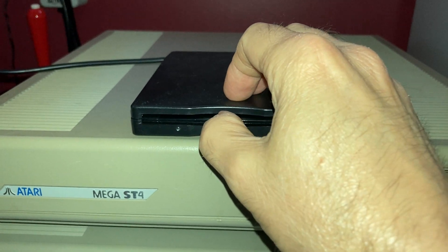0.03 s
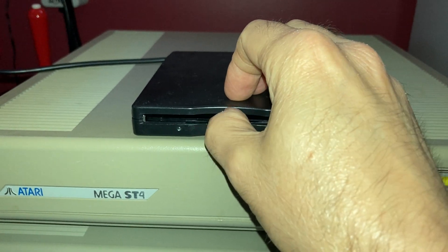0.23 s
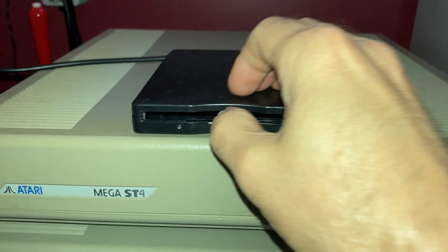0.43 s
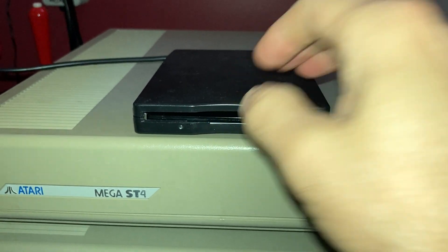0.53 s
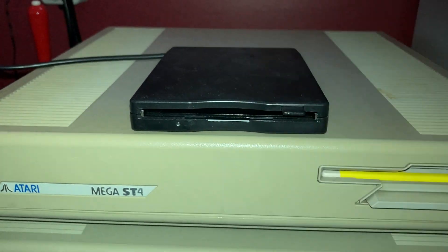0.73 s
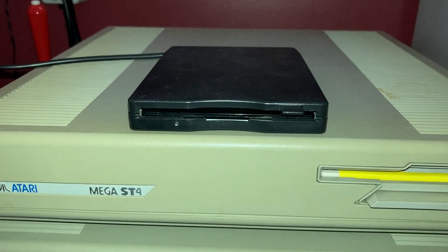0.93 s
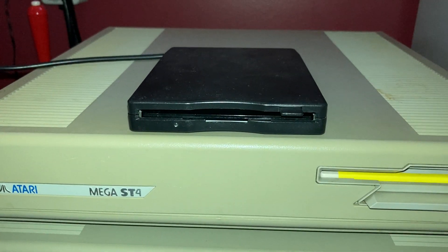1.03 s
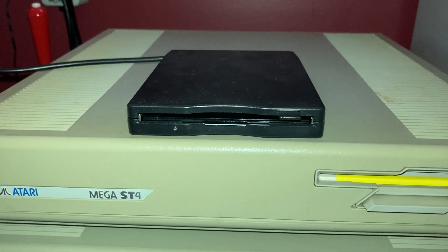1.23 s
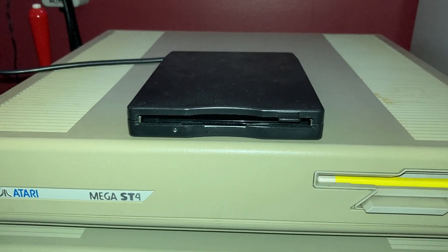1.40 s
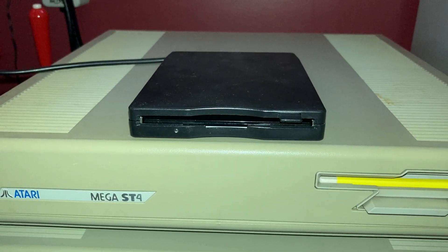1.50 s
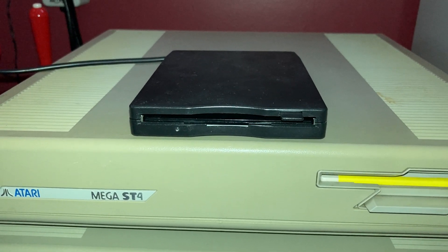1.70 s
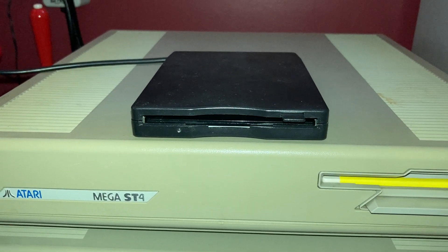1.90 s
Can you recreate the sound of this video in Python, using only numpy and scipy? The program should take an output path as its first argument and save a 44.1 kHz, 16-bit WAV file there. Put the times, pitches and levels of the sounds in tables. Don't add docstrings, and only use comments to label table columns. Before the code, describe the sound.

Sharp plastic-and-metal clack of a disk seating in a drive, with constant computer fan noise behind.

```python
import sys
import numpy as np
from scipy import signal
from scipy.fft import rfft, irfft
from scipy.io import wavfile
from scipy.ndimage import uniform_filter1d

SR = 44100
rng = np.random.default_rng(int(sys.argv[2]) if len(sys.argv) > 2 else 0)


def convert_level_to_amplitude(level_db):
    exponent = np.asarray(level_db, float) / 20
    return 10 ** exponent


def file_out(sig):
    cols = np.atleast_2d(sig).T
    lim = np.clip(cols, -1, 1)
    pcm = np.round(lim * 32767).astype(np.int16)
    wavfile.write(sys.argv[1], SR, pcm)


N = 85995
T = np.arange(N) / SR
BLADE_HZ, MOTOR_HZ, SHAFT_HZ = 381.6, 212.55, 22.3


def evened(x):
    return x / np.sqrt(np.mean(x ** 2) + 1e-20)


def read(points, hz):
    f, value = np.transpose(points)
    return np.interp(np.log(hz + 1), np.log(f + 1), value)


def slow(rate_hz, t, low_hz=0.47):
    f = np.geomspace(low_hz, rate_hz, num=20)[:, None]
    coarse = np.linspace(0, t[-1], num=600)
    waves = np.sin(2 * np.pi * (f * coarse + rng.random((20, 1)))) / f ** 0.44
    return np.interp(t, coarse, evened(waves.sum(0)))


def whine():
    tone_hz = [60, 667, 1567, 3300, 3434] + [BLADE_HZ * k for k in (1, 2, 3)] + [MOTOR_HZ * k for k in (7, 8, 9, 10, 12)] + [2998]
    # (level [dB rms], right lead [rad], right gain [dB])
    tone_levels = [(-66, 1, -4.5), (-71, 1, 1.5), (-83.5, 4.5, -2.5), (-74, 2.5, 1), (-79, 4.5, 4),
                   (-68, 1.2, 0.5), (-55.5, 0.48, 0.87), (-69, 1.1, 6), (-76, 1, 4), (-60.5, 0.7, 0.3),
                   (-61.5, -0.4, -1.3), (-71.5, 1.3, 6), (-79.5, -0.1, -0.5), (-78.5, -1, 2)]
    # (time [s], level [dB])
    hand_shade = [
        (0, -7),
        (.35, -6),
        (.62, -12.5),
        (1.1, 0),
        (1.95, -1.5),
    ]
    order_swell = {10: 5., 9: .4}
    throb_hz, throb_depth, throb_peak_s, waver_per_db = 1700, .6, 1.522, .2
    shade_end_s, shade_db, shade_hz = 0.55, -1.5, 1000

    out = np.zeros((2, N))
    clear = np.interp(T, *np.transpose(hand_shade))
    shaded = np.clip((shade_end_s - T) / 0.025, 0, 1)
    for hz, (db, lead, right_db) in zip(tone_hz, tone_levels):
        throbs = abs(hz - throb_hz) < 20
        waver_db = min(waver_per_db * (-48.0 - db), 3.)
        swell = order_swell.get(round(hz / MOTOR_HZ), 0) * (T - T[-1] / 2)
        drift = shade_db * (hz > shade_hz) * shaded + swell
        throb = 1 + throb_depth * throbs * np.cos(2 * np.pi * SHAFT_HZ * (T - throb_peak_s))
        waver = waver_db * (1 - .5 * throbs) * slow(39.96, T, low_hz=4.5)
        level = convert_level_to_amplitude(db + waver + clear * throbs + drift) * throb * np.sqrt(2)
        turn = 2 * np.pi * (hz * T + rng.random() + 0.014 * waver_db * slow(5.43, T))
        out += level * np.array([np.sin(turn), convert_level_to_amplitude(right_db) * np.sin(turn + lead)])
    return out


def cogging():
    base_db, db_per_oct = -77, -11
    out = np.zeros((2, N))
    for k in range(11, 42):
        side, weaker, phase, lead = rng.random(4)
        hz = MOTOR_HZ * k + SHAFT_HZ * np.round(4 * side - 2)
        level = convert_level_to_amplitude(base_db - 5.7 * weaker + db_per_oct * np.log2(hz / 2500) + 5.3 * slow(17, T))
        out += level * np.sin(2 * np.pi * (hz * T + phase + np.array([[0], [.5 * lead]])))
    return out


def air(spectrum, patchy_db, comb_db=0):
    frames, hz = N // 256 + 5, np.fft.rfftfreq(1024, 1 / SR)
    a, b, c, d, p = rng.standard_normal((frames, 513, 5)).T
    patches = evened(uniform_filter1d(uniform_filter1d(p, size=10, axis=0), size=12, axis=1))
    comb = comb_db * (hz > 4.5 * MOTOR_HZ) * np.cos(2 * np.pi * hz / MOTOR_HZ)
    colour = read(spectrum, hz) + comb
    z = np.array([a + 1j * b, c + 1j * d]) * convert_level_to_amplitude(colour[:, None] + patchy_db * patches)
    return evened(signal.istft(z, nperseg=1024, noverlap=768)[1][:, :N])


def ports(x, same, lead):
    split_hz, in_step_hz, lag_s = 5200, 8120, .0003005
    a, b = rfft(x, 2 * N)
    hz = np.fft.rfftfreq(2 * N, 1 / SR)
    late = -2 * np.pi * (hz - in_step_hz) * lag_s
    f, rad = np.transpose(lead + [(split_hz, -2 * np.pi * (split_hz - in_step_hz) * lag_s)])
    phase = np.where(hz > split_hz, late, np.interp(hz, f, rad))
    c = np.clip(read(same, hz), 0, 1)
    right = (c * a + np.sqrt(1 - c ** 2) * b) * np.exp(1j * phase)
    return irfft(np.array([a, right]), 2 * N)[:, :N]


def fan_air():
    # (frequency [Hz], level [dB])
    rush_low = [(30, -38), (55, -1.5), (300, -14), (750, -1.5), (950, -10), (1500, -5), (2100, -7),
                (2500, -12)]
    rush_high = [(2500, -14.5), (2750, -8.5), (3600, -22), (4200, -14), (5000, -21.5), (6200, -25),
                 (7000, -18), (9000, -57)]
    # (frequency [Hz], level [dB])
    hiss_colour = [(6000, -54), (8000, -5.5), (9500, -9), (11300, -6.5), (12200, -19), (13500, -15.5),
                   (15100, 1.5), (15900, -18)]
    # (frequency [Hz], level [dB])
    rumble_colour = [(35, -34), (60, -15), (150, 3.5), (240, 3.5), (400, -6.5), (700, -3.5), (1100, -35)]
    # (time [s], level [dB])
    handling = [
        (0, -61),
        (.2, -51.5),
        (.45, -52),
        (.7, -61.5),
        (1.14, -62),
        (1.22, -68),
        (1.95, -63.5),
    ]
    # (frequency [Hz], likeness [0-1])
    far_same = [(60, 1), (500, 0.78), (1500, 0.31), (4000, 0.13), (6000, 0.25), (7500, 0.97), (16000, 0.86)]
    # (frequency [Hz], phase [rad])
    far_lead = [(0, 0), (1400, 1.9), (1800, 1.33), (2700, -12), (3500, 5), (4600, 30.5)]

    rush = convert_level_to_amplitude(-56) * air(rush_low[:-1] + rush_high, patchy_db=1.0, comb_db=3)
    hiss = convert_level_to_amplitude(-70) * air(hiss_colour, patchy_db=1.2)
    rumble = convert_level_to_amplitude(np.interp(T, *np.transpose(handling))) * air(rumble_colour, patchy_db=2.0)
    return ports(rush + hiss + rumble, far_same, far_lead)


def latch():
    # (time [s], strength [dB], dullness [0-1])
    snaps = [(0.195, -22.5, 0.68), (0.1981, -26, 0.33), (0.2, -15.5, 0.17), (0.201, -21.5, 0),
             (0.2029, -13.5, 0.02), (0.2057, -12, 0.36), (0.2067, -11.5, 0.1), (0.2088, -16, 0.19),
             (.2112, -22.5, 0), (0.2131, -15, 0.51), (0.2185, -19.5, 0.5), (0.224, -42, 0.3),
             (.2275, -31, 0.8), (0.239, -40, .8), (0.262, -39.5, 0.7)]
    # (time [s], strength [dB], dullness [0-1])
    light_taps = [
        (0.0901, -33, 0.94),
        (.0925, -30, 0.93),
        (.0965, -36, 1),
        (.1, -33, 1),
        (0.147, -44, 0.97),
        (0.16, -51, 1),
        (0.3141, -36.5, 0.1),
        (.3163, -34, 0.01),
        (.581, -53, 0.44),
    ]
    # (frequency [Hz]), (level [dB]), (t60 [s])
    shell_hz = [670, 860, 955, 1200, 1405, 1625, 1778, 1958, 2372, 3125, 3742, 4180, 4820, 5175, 5365, 7800,
                8280, 11200, 12000, 14400]
    shell_db = [0.5, 2, 0, -4, -5.5, -1.5, -6.5, 2, -6.5, -7.5, -1, -0.5, -10, 0.5, -2.5, -4, -4.5, -12,
                -14.5, 4]
    shell_t60 = [.04, .035, .035, .035, .03, .04, .035, .035, .04, .025, .035, .025, .025, .025, .018, .012,
                 .02, .01, .01, .01]
    burst_s, dull_db_per_oct, tick_db = 0.00073, -4, 7
    firm = .6

    out, t = np.zeros((2, N)), np.arange(3000) / SR
    burst_t = t[:400] / burst_s
    tick_low_cut = signal.butter(2, 526, "high", fs=SR)
    for s, db, dull in snaps + light_taps:
        burst = rng.standard_normal((2, 400)) * burst_t ** .5 * np.exp(-burst_t)
        burst /= np.linalg.norm(burst, axis=1, keepdims=True)
        burst[:, 20] += firm
        body = np.zeros(len(t))
        for hz, d, t60 in zip(shell_hz, shell_db, shell_t60):
            level = convert_level_to_amplitude(d + dull * dull_db_per_oct * np.log2(hz / 700) - 60 * t / t60)
            body += level * np.sin(2 * np.pi * (hz * t + rng.random()))
        tick_hz = 13300 * convert_level_to_amplitude(-22 * dull)
        tick = 2 * np.pi * tick_hz / SR * np.exp(-2 * np.pi * tick_hz * t)
        body += 10 * convert_level_to_amplitude(tick_db) * signal.lfilter(*tick_low_cut, tick)
        at = round(s * SR)
        out[:, at:at + 3399] += convert_level_to_amplitude(db - 13.0) * signal.fftconvolve(burst, body[None], axes=1)
    return out


def case():
    # (frequency [Hz], level [dB], t60 [s], rise [s])
    case_modes = [(55.8, -35, 0.68, 0.016), (116.8, -36.5, 0.46, 0.01208), (140.4, -28, 0.24, 0.0083),
                  (186.5, -25, 0.0702, 0.0024), (214.3, -31.5, 0.33, .004), (307, -35, 0.25, 0.0076),
                  (352.7, -36.5, 0.21, 0.0044), (399, -24, 0.08, 0.0013), (432.6, -29, 0.14, 0.00201)]
    # (time [s], level [dB], held until damped [s], softness: loss away from 200 Hz [dB/octave])
    thumps = [
        (.199, 0, 0.12, 0.5),
        (0.091, -14, 0.012, 10),
        (.150, -22.5, 0.012, 11),
        (.41, -21.5, 0.037, 13),
        (1, -34, 0.021, -2),
    ]
    left_db = 3

    out = np.zeros(N)
    for s, db, held, soft_db in thumps:
        t = np.maximum(T - s, 0)
        damp = db - 1200 * np.maximum(t - held, 0)
        for hz, d, t60, rise in case_modes:
            level = convert_level_to_amplitude(d + damp - soft_db * abs(np.log2(hz / 200)) - 60 * t / t60)
            out += (1 - np.exp(-(t / rise) ** 2)) * level * np.sin(2 * np.pi * (hz * t + rng.random()))
    return np.array([convert_level_to_amplitude(left_db) * out, out])


def spread(x):
    cycles, corner_hz = 3.6, 70
    hz = np.fft.rfftfreq(2 * N, 1 / SR)
    turn = np.exp(-2j * np.pi * cycles * np.log(1 + hz / corner_hz))
    return irfft(rfft(x, 2 * N) * turn, 2 * N)[:, :N]


def room(x):
    # (frequency [Hz], t60 [s])
    room_t60 = [(100, 0.15), (260, 0.24), (700, 0.1), (1840, 0.19), (3700, 0.25), (5600, 0.17),
                (12800, 0.13)]
    room_db = -8

    taps = np.zeros((2, SR // 2))
    at = np.arange(160, SR // 2 - 20, 20)
    at = at + rng.integers(0, 20, (2, len(at)))
    np.put_along_axis(taps, at, rng.choice([-1., 1.], at.shape), 1)
    hz, t, z = signal.stft(taps, SR, nperseg=256)
    decay = convert_level_to_amplitude(-60 * t / read(room_t60, hz)[:, None])
    tail = signal.istft(z * decay, SR, nperseg=256)[1]
    return convert_level_to_amplitude(room_db) * signal.fftconvolve(x, tail / np.linalg.norm(tail[0]), axes=1)[:, :N]


def ring(x, hz, width_hz):
    r = np.exp(-np.pi * width_hz / SR)
    pole = r * np.exp(2j * np.pi * hz / SR)
    return 2 * signal.lfilter([1 - r], [1, -pole], x + 1e-18).real


def shutter():
    # (time [s], level [dB])
    slip_steps = [
        (0.3138, 1),
        (.3162, -3),
        (0.3216, -5),
        (0.3289, 0),
        (0.3335, -1),
        (0.3404, -2.5),
        (0.3462, -4),
        (0.3504, -4.5),
        (.356, -12),
    ]
    # (frequency [Hz], level [dB], width [Hz])
    buzz_notes = [(966, -4, 52), (1980, -5.5, 98), (2192, -1, 88), (2630, -5, 150), (1580, -12, 85),
                  (395, -11.5, 56)]
    buzz_db, linger_from_s, linger_rise_s, linger_db, linger_t60 = -38.5, 0.33, .01, -56, 1.3

    slips, t = np.zeros((2, N)), np.arange(100) / SR
    for s, db in slip_steps:
        scratch = 0.12 * rng.standard_normal((2, 100)) * np.exp(-t / .0008)
        scratch[:, 0] += 1
        slips[:, round(s * SR):][:, :100] += convert_level_to_amplitude(db) * scratch
    notes = sum(convert_level_to_amplitude(db) * ring(slips, hz, w) * SR / (2 * np.pi * w) for hz, db, w in buzz_notes)
    hum_hz = buzz_notes[0][0]
    hum = evened(ring(ring(rng.standard_normal((2, N)), hum_hz, 30.0), hum_hz, 230.0))
    since = np.maximum(T - linger_from_s, 0)
    linger = np.minimum(since / linger_rise_s, 1) * convert_level_to_amplitude(linger_db - 60 * since / linger_t60)
    return convert_level_to_amplitude(buzz_db) * notes + linger * hum


def spindle():
    # (frequency [Hz], level [dB rms])
    motor_tones = [(104.4, -66), (156.4, -61)]
    # (start [s], stop [s])
    start_s, stop_s = (.42, 1.17)
    db_per_s = -7.5

    on = np.clip(np.minimum(T - start_s, stop_s - T) / 0.015, 0, 1)
    hum = np.zeros(N)
    for hz, db in motor_tones:
        level = convert_level_to_amplitude(db + db_per_s * (T - start_s) + 3.7 * slow(15.6, T))
        hum += level * np.sqrt(2) * np.sin(2 * np.pi * hz * T)
    return on * hum


def scene():
    # (frequency [Hz], likeness [0-1])
    near_same = [(60, 0.63), (900, 0.61), (2000, 0.36), (4000, 0.232), (6000, 0.88), (7500, 0.91),
                 (16000, 0.95)]
    # (frequency [Hz], phase [rad])
    near_lead = [(0, 0.1014), (1900, 0.26), (2500, 2.6), (3500, 3.56), (4500, 3.8)]
    case_to_room_db = -21

    fan = whine() + cogging() + fan_air()
    sharp, low = latch() + shutter(), case()
    near = spread(sharp + room(sharp + convert_level_to_amplitude(case_to_room_db) * low))
    return fan + ports(near, near_same, near_lead) + spread(low) + spindle()


def low_pass(x):
    return signal.sosfilt(signal.butter(12, 16820, fs=SR, output="sos"), x)


def record(dry):
    low_cut = signal.butter(4, 37, "high", fs=SR, output="sos")
    low = signal.sosfilt(low_cut, dry)
    top = signal.firwin(255, 15850, window=("kaiser", 7), fs=SR)
    mix = signal.oaconvolve(low, top[None], "same")
    return low_pass(mix)


dry = scene()
out = record(dry)
file_out(out)
```